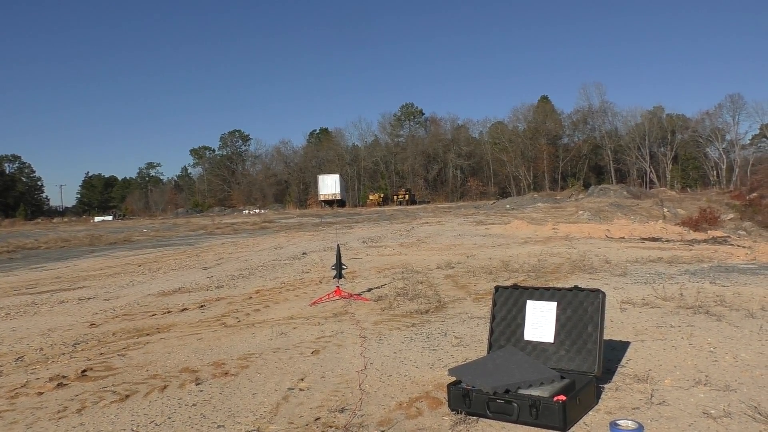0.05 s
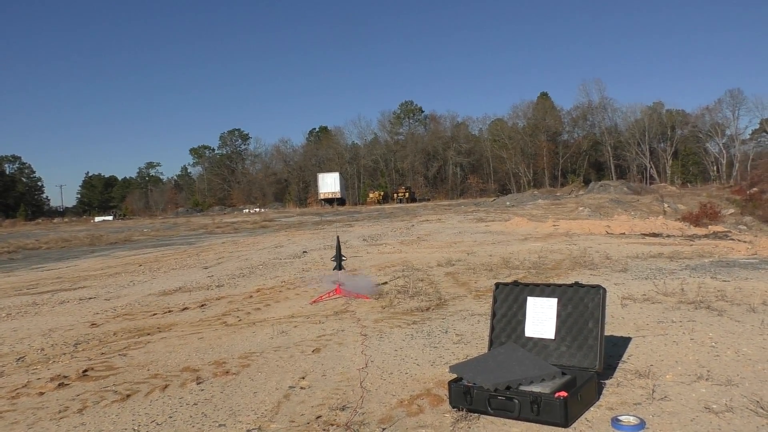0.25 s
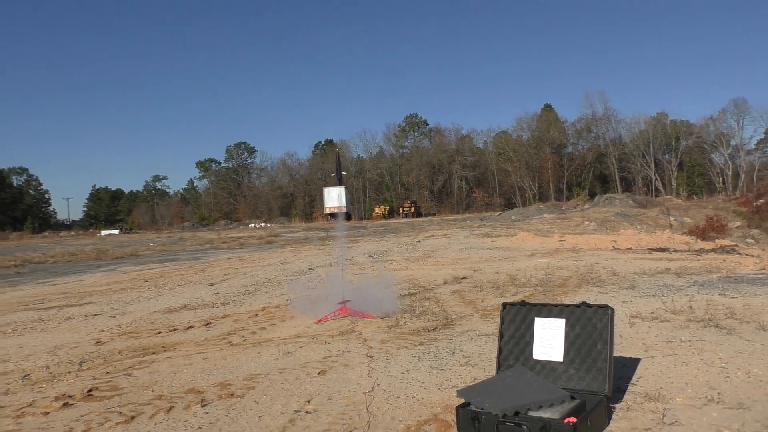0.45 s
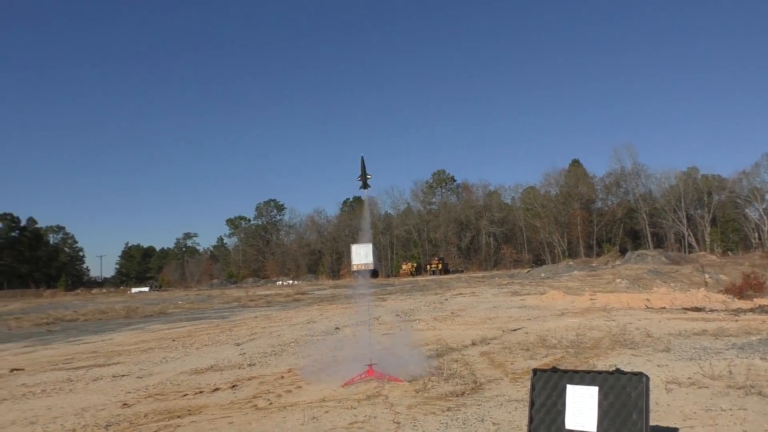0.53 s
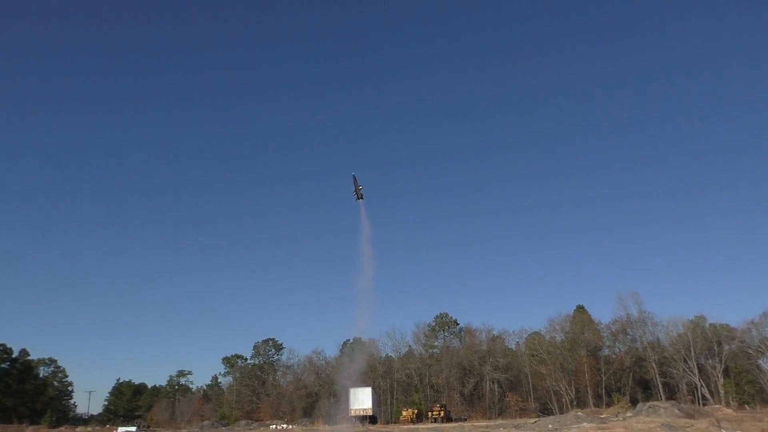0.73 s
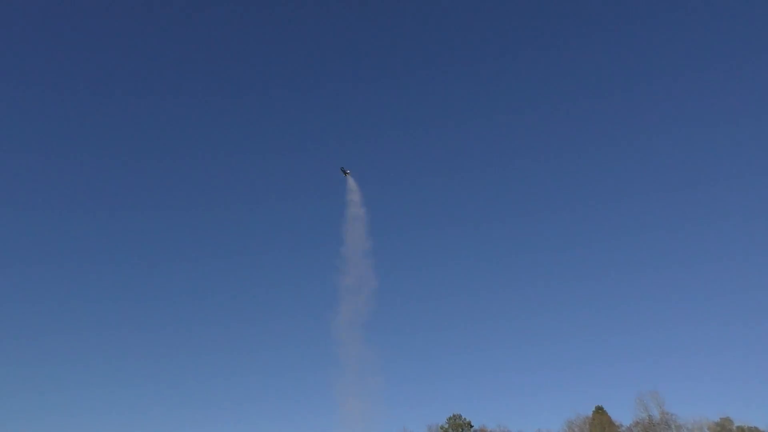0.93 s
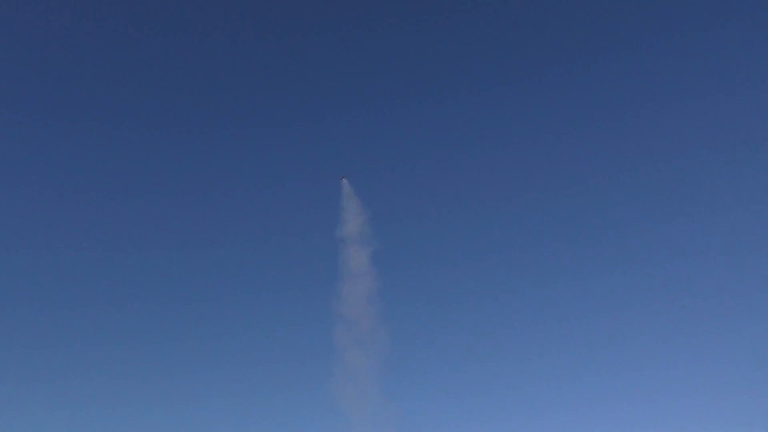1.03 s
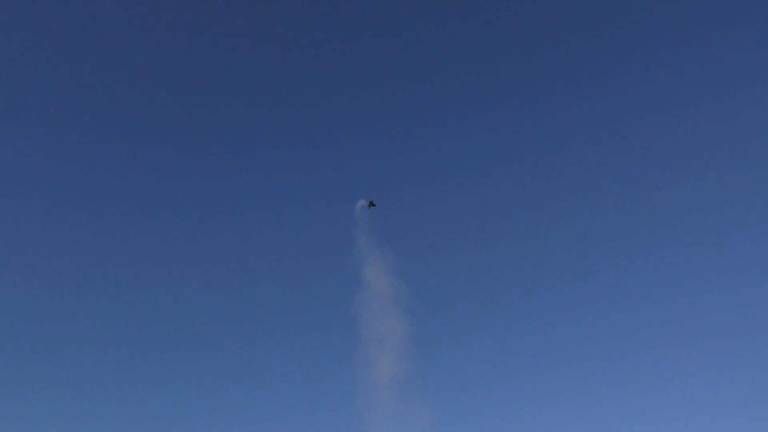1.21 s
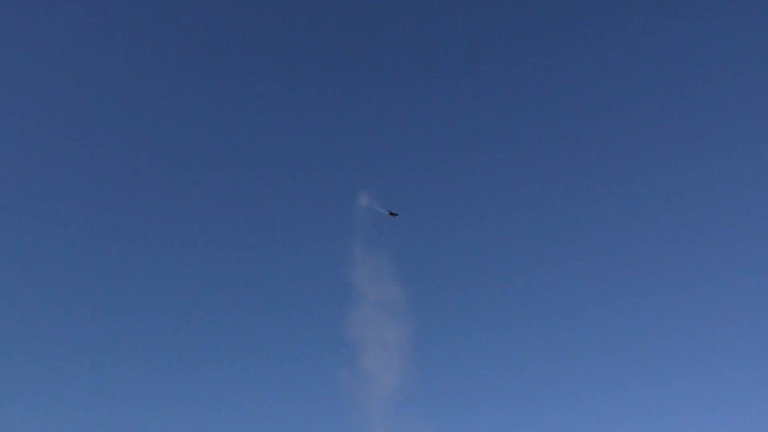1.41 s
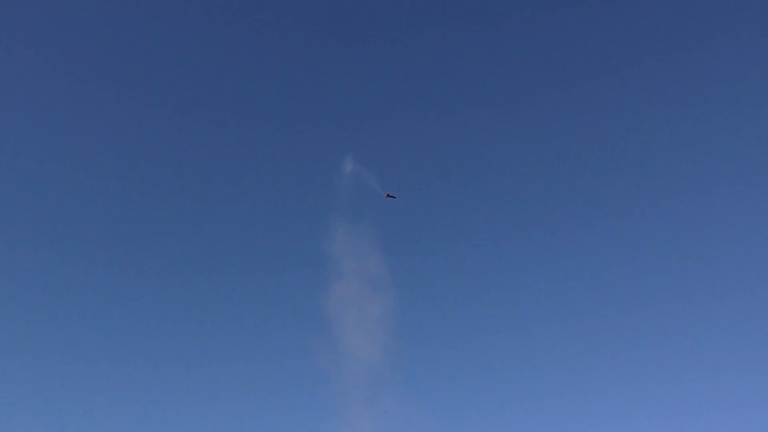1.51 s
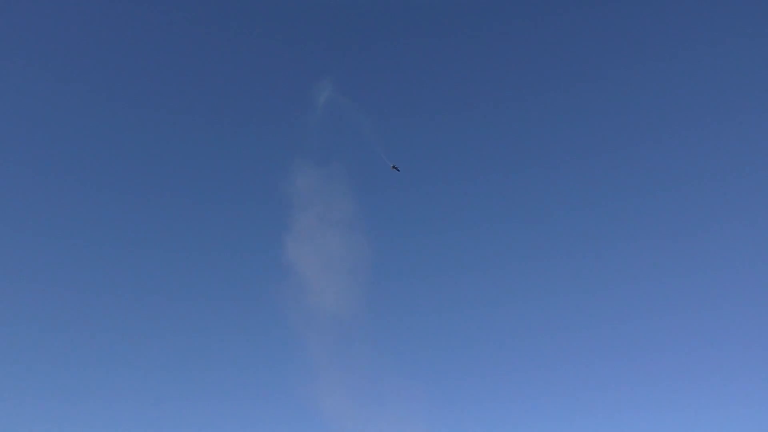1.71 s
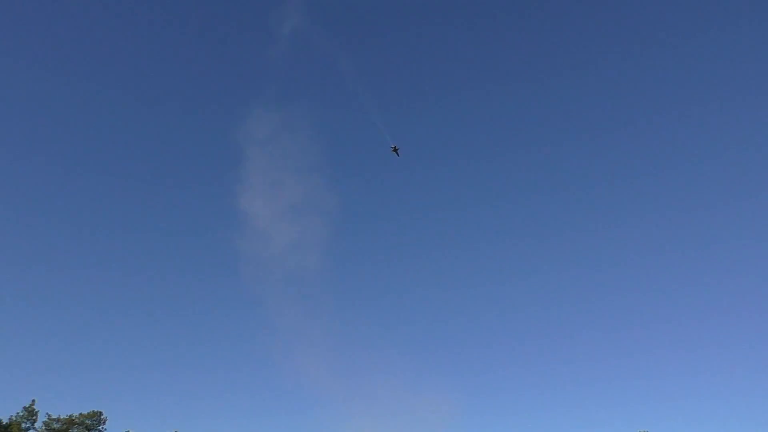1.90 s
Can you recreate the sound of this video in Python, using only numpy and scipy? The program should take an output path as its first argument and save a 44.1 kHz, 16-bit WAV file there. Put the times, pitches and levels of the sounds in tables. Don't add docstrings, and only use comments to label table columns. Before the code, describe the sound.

A small rocket ignites with a sharp crack and a bright, rough roar against its pad, then hisses upward, cuts out after about a second and leaves a faint fizz; open field, close stereo microphone.

```python
import sys
import numpy as np
from scipy import signal
from scipy.fft import rfft, irfft
from scipy.io import wavfile
from scipy.ndimage import uniform_filter1d, map_coordinates

SR = 44100
rng = np.random.default_rng(int(sys.argv[2]) if len(sys.argv) > 2 else 0)


def to_linear_factor(level_db):
    exponent = np.asarray(level_db, float) / 20
    return 10 ** exponent


def unload_wav(signal):
    wavfile.write(
        sys.argv[1],
        SR,
        np.round(np.clip(np.atleast_2d(signal).T, -1, 1) * 32767).astype(np.int16),
    )


N = 85995
T = np.arange(N) / SR

# frequency in Hz, level in dB.
FIELD_COLOUR = [(25, -30), (55, -10), (200, -2), (500, -19.5), (1500, -23.5), (3000, -27.5), (4200, -45),
                (6000, -56)]
# frequency in Hz, likeness 0 to 1.
FIELD_LIKENESS = [(60, 0.97), (240, 0.96), (950, 0.96), (3770, 0.38), (15000, 0.39)]
# frequency in Hz, level in dB.
ENGINE_HUMS = [(61, -45), (126, -45), (186, -46), (240, -49)]
# frequency in Hz, level in dB.
WIND_COLOUR = [(20, 2), (45, 0), (120, -13), (300, -14), (700, -40)]
# time in seconds, level in dB, brightness in dB per octave.
SMOKE_COURSE = [(1.14, -46, -3), (1.23, -43.5, 5.5), (1.3, -40.5, 5), (1.385, -38, 4), (1.5, -38.5, 0),
                (1.6, -41, 1.5), (1.75, -38, 1.5), (1.87, -34.5, 1.5), (1.95, -32, 2)]
# frequency in Hz, level in dB.
FIZZ_COLOUR = [(290, -31), (500, -18), (829, -15.5), (1240, -10), (2000, -5.5), (3000, -7), (3520, -14.5),
               (6830, -23), (15800, -45)]
# time in seconds, half length in seconds, level in dB.
SMOKE_FLARES = [
    (1.387, 0.088, -45),
    (1.97, 0.053, -48),
]
# frequency in Hz, level in dB.
BLAST_COLOUR = [(60, -21), (200, -8), (700, -12.5), (1500, -7.5), (3000, -7.5), (6500, -10), (10000, -36)]
# time in seconds, thrust level in dB, brightness in dB per octave.
THRUST = [(0.166, -36, -4), (0.181, -23, 2), (0.226, -19.5, 2), (0.249, -13, 4.5), (.3, -16, 2),
          (0.399, -14, 2.5), (.42, -21.5, -1.5), (.44, -22, -0.5), (.51, -20, -1), (.59, -16.5, -1),
          (.69, -19.5, -1), (.79, -16, 1), (.89, -16, 1), (.97, -20, 0), (1.02, -18.5, -2), (1.09, -20, -3),
          (1.126, -30.5, -7.5), (1.165, -41.5, -3.5)]
# frequency in Hz, level in dB.
JET_COLOUR = [(59, -46), (100, -21), (282, -33.5), (405, -20), (732, -21.5), (3030, -2), (5720, -5.5),
              (11300, -3), (15800, -8.5)]
# frequency in Hz, level in dB, 60 dB decay in seconds.
CRACK_RINGS = [(1500, -3, .006), (3500, -2, .008), (5300, -3, .003), (6900, -5, .003), (10500, -1, .002),
               (15500, -9, .002)]
# time in seconds, lag in ms.
BOUNCE_LAG = [(0.2, 0.19), (0.3, 0.26), (0.38, 0.285), (0.44, 0.445), (0.52, 0.785), (0.68, 1.587),
              (0.84, 2.481), (1.0, 3.284), (1.16, 3.777), (1.3, 3.967), (1.45, 4.047), (1.64, 3.982),
              (1.88, 3.817), (1.95, 3.766)]
# frequency in Hz, width in Hz, level in dB.
PAD_REFLECTIONS = [(2610, 560, -1), (3700, 230, 1.5), (4300, 200, -8), (7040, 390, 8.5), (8450, 1000, -3),
                   (11100, 1300, 4.5)]
# frequency in Hz, likeness 0 to 1.
ROCKET_LIKENESS = [(300, .78), (800, .98), (1850, .84), (3200, .975), (7500, .998), (10300, .975),
                   (11700, .995), (13800, .945)]
# frequency in Hz, width in Hz, left louder in dB, left leading in radians.
PORT_DIFFERENCES = [(1600, 400, -3.5, .1), (2050, 300, 0, .5), (2450, 300, 1.5, .2), (4400, 750, 2.3, .17),
                    (10300, 700, 1.4, .18), (13200, 500, 2.4, .05), (14000, 500, .8, -.2)]
# frequency in Hz, width in Hz, level in dB.
HOUSING = [(1410, 395, 3.5), (3750, 2600, 1), (5560, 580, -3), (6620, 270, 0.5), (7800, 500, -2),
           (11640, 3300, 3.5)]

PIVOT_HZ = 4000
FIELD_DB, SELF_NOISE_DB = -33.5, -62
WIND_DB, WIND_END_S = -42, 1
BLAST_START_S, BLAST_PEAK_S, BLAST_END_S = 0.16, 0.2586, 0.4
BLAST_DB, BLAST_SAG_DB, LUMPS_DB = -18, -10.5, 2
SPUTTER_DB = 1.16
TICK_S, TICK_DB = 0.058, -53
CRACK_S, CRACK_DB = 0.15972, -1
BOUNCE_GAIN, BOUNCE_HZ = 0.72, 6000
LOW_GAIN, CLEAR_S = 0.45, (0.45, 0.6)
PAD_FADE_START_S, PAD_FADE_END_S = 0.25, 0.34
DUCK_ABOVE_DB, DUCK_SHARE, DUCK_LAG_S, RECOVER_DB_PER_S = -34.5, 0.88, 0.13, 21
BASS_CUT_HZ, EDGE_HZ = 27, 15860


def evened(x):
    return x / np.sqrt(np.mean(x ** 2) + 1e-20)


def read(points, hz):
    f, value = np.transpose(points)
    return np.interp(np.log(hz + 1), np.log(f + 1), value)


def bumps(table, hz, column=2):
    return sum(row[column] * np.exp(-((hz - row[0]) / row[1]) ** 2) for row in table)


def smooth_noise(size):
    return evened(uniform_filter1d(rng.standard_normal(N), size=size))


def hiss(colour, likeness, patchy_db, flicker_db, slope=None):
    frames, hz = N // 128 + 6, np.fft.rfftfreq(512, 1 / SR)
    a, b, c, d, patches = rng.standard_normal((frames, 257, 5)).T
    patches = uniform_filter1d(patches, size=8, axis=0)
    patches = evened(uniform_filter1d(patches, size=14, axis=1))
    flicker = rng.standard_normal((frames, 257)).T
    flicker = evened(uniform_filter1d(flicker, size=120, axis=0))

    shape = read(colour, hz)[:, None] + np.zeros(frames)
    if slope is not None:
        octaves = np.log2((hz[:, None] + 300) / PIVOT_HZ)
        shape = shape + octaves * np.interp(np.arange(frames) * 128 / SR, T, slope)
    shape = to_linear_factor(shape) / np.sqrt(np.mean(to_linear_factor(2 * shape), axis=0))

    like = np.clip(read(likeness, hz), 0, 1)[:, None]
    left = a + 1j * b
    right = like * left + np.sqrt(1 - like ** 2) * (c + 1j * d)
    z = np.array([left, right]) * shape * to_linear_factor(patchy_db * patches + flicker_db * flicker)
    return evened(signal.istft(z, nperseg=512, noverlap=384)[1][:, :N])


def field():
    out = to_linear_factor(FIELD_DB) * hiss(FIELD_COLOUR, FIELD_LIKENESS, 1.47, 1.3)
    for hz, db in ENGINE_HUMS:
        wander, throb = smooth_noise(1500), smooth_noise(1500)
        phase = 2 * np.pi * np.cumsum(hz + 4.38 * wander) / SR
        out = out + to_linear_factor(db + 5 + 1.14 * throb) * np.sin(phase)
    return out


def ducking():
    s, db, _ = np.transpose(THRUST)
    over = np.maximum(np.interp(T, s, db, left=-60) - DUCK_ABOVE_DB, 0)
    r = np.exp(-1 / (DUCK_LAG_S * SR))
    over = signal.lfilter([1 - r], [1, -r], over)
    climb = T * RECOVER_DB_PER_S
    held = np.maximum.accumulate(over + climb) - climb
    return to_linear_factor(-DUCK_SHARE * held)


def wind():
    on = np.clip((T - CRACK_S) / 0.076, 0, 1) * np.clip((WIND_END_S - T) / 0.1, 0, 1)
    return to_linear_factor(WIND_DB) * on * hiss(WIND_COLOUR, [(50, 0.16), (500, 0.22)], 3.8, 1.3)


def smoke():
    s, db, slope = np.transpose(SMOKE_COURSE)
    fizz = hiss(FIZZ_COLOUR, ROCKET_LIKENESS, 0.6, 0.66, np.interp(T, s, slope))
    fizz = fizz * to_linear_factor(np.interp(T, s, db)) * np.clip((T - s[0] + 0.075) / 0.032, 0, 1)
    flare = sum(to_linear_factor(peak_db) * np.exp(-((T - at) / half) ** 2) for at, half, peak_db in SMOKE_FLARES)
    return fizz + flare * hiss(JET_COLOUR, ROCKET_LIKENESS, 0.89, 1.2, 2.9 + 0 * T)


def ground(x):
    s, ms = np.transpose(BOUNCE_LAG)
    lag = uniform_filter1d(np.interp(T, s, ms), size=2000) * SR / 1000
    dull = signal.filtfilt(*signal.butter(1, BOUNCE_HZ, fs=SR), x)
    late = np.array([map_coordinates(v, [np.arange(N) - lag], order=3) for v in dull])
    gain = np.interp(T, CLEAR_S, (LOW_GAIN, BOUNCE_GAIN))
    return (x + gain * late) / np.sqrt(1 + BOUNCE_GAIN ** 2 / 2)


def near_pad(x):
    low = 1 - np.clip((T - PAD_FADE_START_S) / (PAD_FADE_END_S - PAD_FADE_START_S), 0, 1)
    reflected = irfft(rfft(x) * to_linear_factor(bumps(PAD_REFLECTIONS, np.fft.rfftfreq(N, 1 / SR))), N)
    return low * reflected + (1 - low) * x


def pad_blast():
    gone_s = BLAST_END_S + 0.015
    times = [BLAST_START_S, BLAST_PEAK_S, BLAST_END_S, gone_s]
    db = BLAST_DB + np.interp(T, times, [-18, 0, BLAST_SAG_DB, -45])
    level = to_linear_factor(db + LUMPS_DB * smooth_noise(100))
    return hiss(BLAST_COLOUR, ROCKET_LIKENESS, 1.2, 0.88) * level * (T > CRACK_S) * (T < gone_s)


def crack(at, peak_db):
    t = np.maximum(T - at - 0.0001, 0)
    ring = sum(to_linear_factor(db - 60 * t / t60) * np.sin(2 * np.pi * hz * t) for hz, db, t60 in CRACK_RINGS)
    suck = 0.3 * np.exp(-((T - at - 0.00005) / 0.00005) ** 2)
    return to_linear_factor(peak_db) * (ring / abs(ring).max() - suck)


def igniter():
    return crack(CRACK_S, CRACK_DB) + crack(TICK_S, TICK_DB)


def motor():
    s, db, slope = np.transpose(THRUST)
    level = to_linear_factor(np.interp(T, s, db) + SPUTTER_DB * smooth_noise(30))
    gate = np.clip((T - s[0] + 0.005) / 0.005, 0, 1) * np.clip((s[-1] + 0.071 - T) / 0.059, 0, 1)
    return hiss(JET_COLOUR, ROCKET_LIKENESS, 1.0, 0.89, np.interp(T, s, slope)) * level * gate


def scene():
    flight = ground(motor() + smoke())
    rocket = near_pad(flight + pad_blast()) + igniter()
    hz = np.fft.rfftfreq(N, 1 / SR)
    half = to_linear_factor(bumps(PORT_DIFFERENCES, hz) / 2) * np.exp(0.5j * bumps(PORT_DIFFERENCES, hz, column=3))
    at_ports = irfft(rfft(rocket) * np.array([half, 1 / half]), N)
    return at_ports + field() * ducking() + wind()


def band_limit(x):
    return signal.sosfilt(signal.butter(12, 17030, fs=SR, output="sos"), x)


def record(dry):
    hz = np.fft.rfftfreq(N, 1 / SR)
    treble_edge = to_linear_factor(-60 * np.clip((hz - EDGE_HZ) / 41, 0, 1))
    bass_cut = hz ** 2 / (hz ** 2 + BASS_CUT_HZ ** 2)
    self_noise = hiss([(50, 0), (16000, 0)], [(4000, 0.44), (7000, 0.76), (12000, 0.7)], 0.45, 0.5)
    noisy = dry + to_linear_factor(SELF_NOISE_DB) * ducking() * self_noise
    mix = irfft(rfft(noisy) * to_linear_factor(bumps(HOUSING, hz)) * treble_edge * bass_cut, N)
    return band_limit(mix)


dry = scene()
out = record(dry)
unload_wav(out)
```